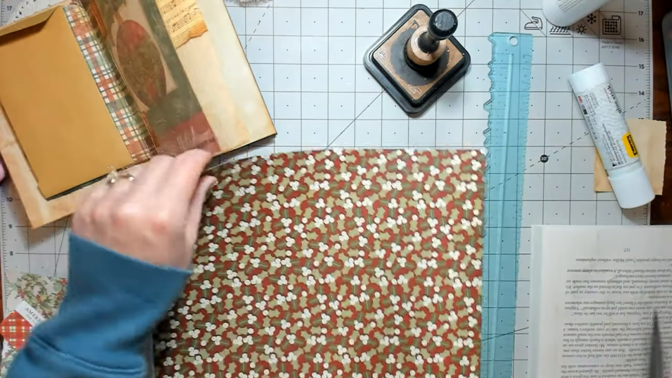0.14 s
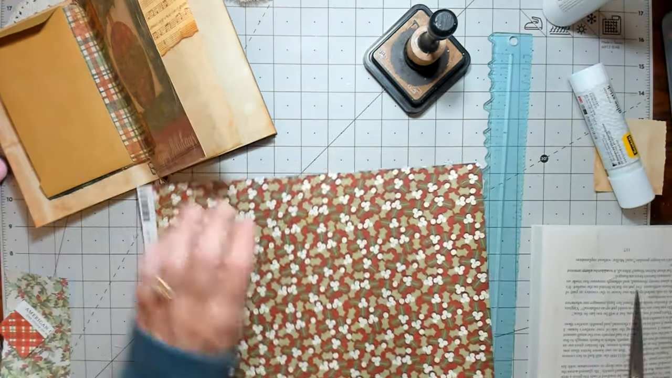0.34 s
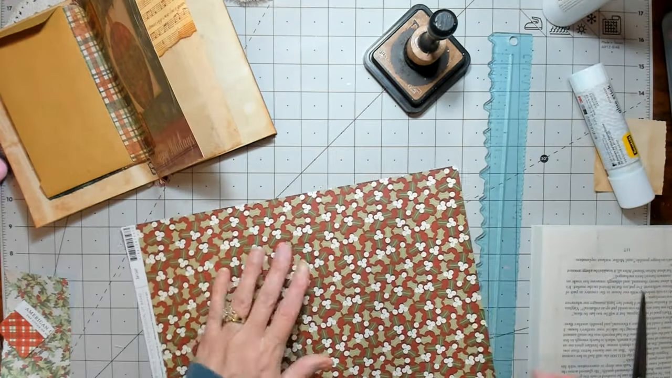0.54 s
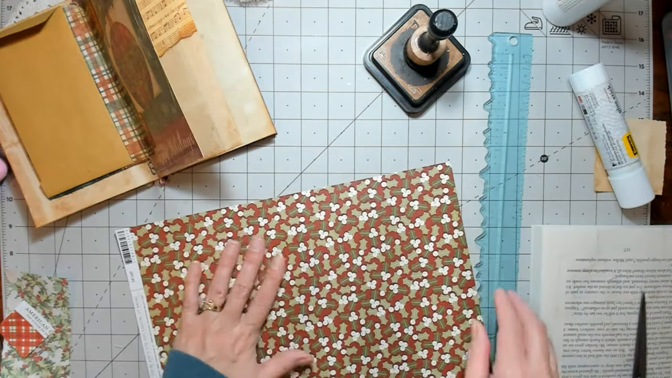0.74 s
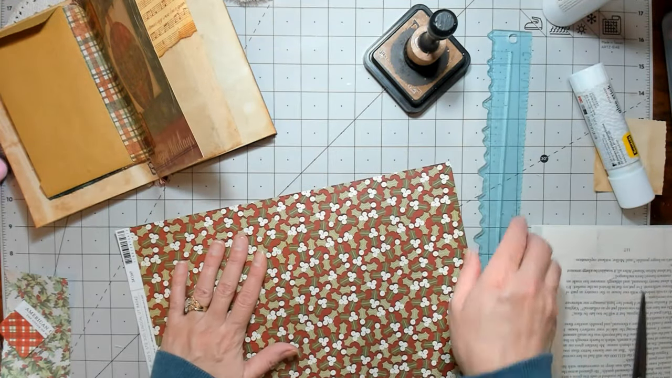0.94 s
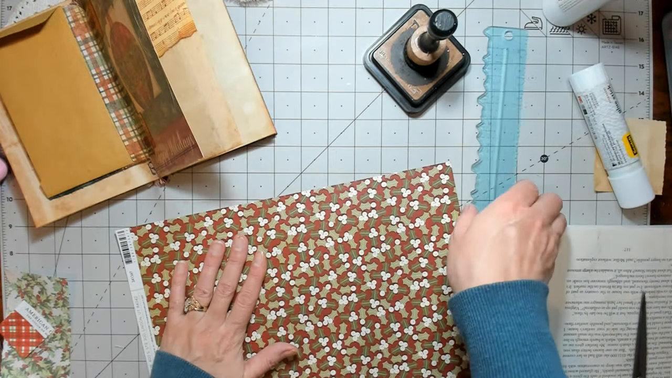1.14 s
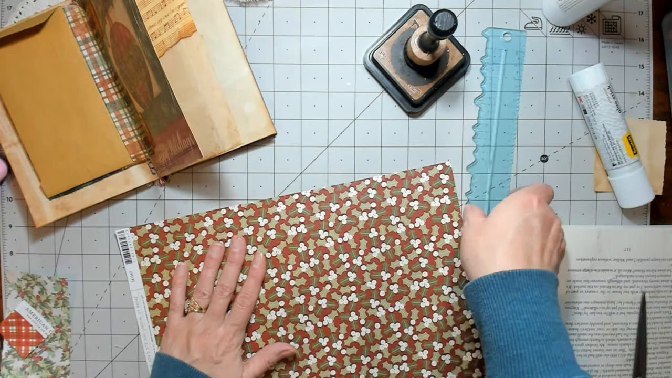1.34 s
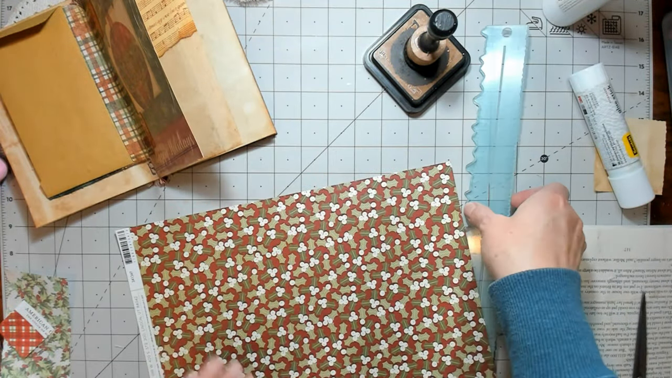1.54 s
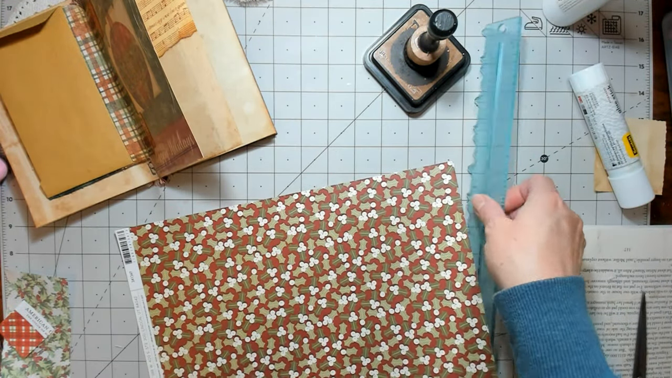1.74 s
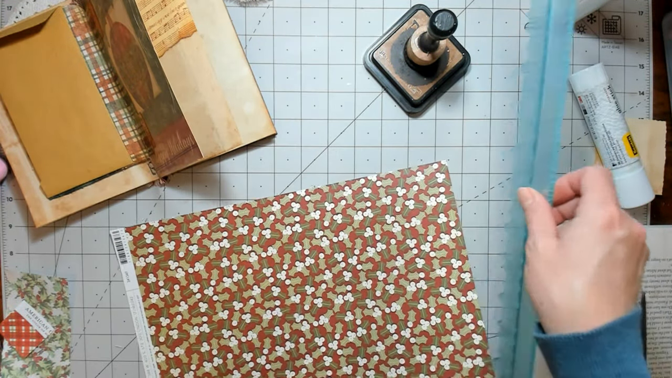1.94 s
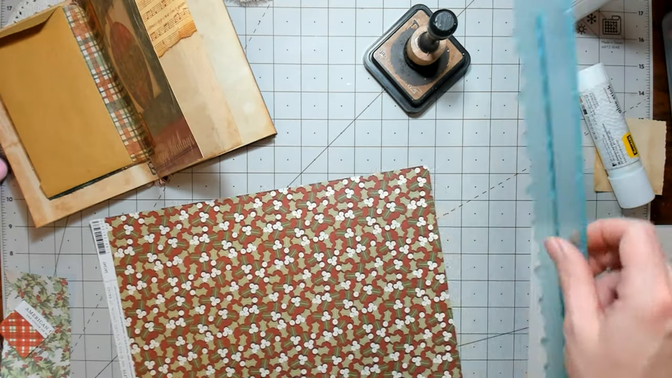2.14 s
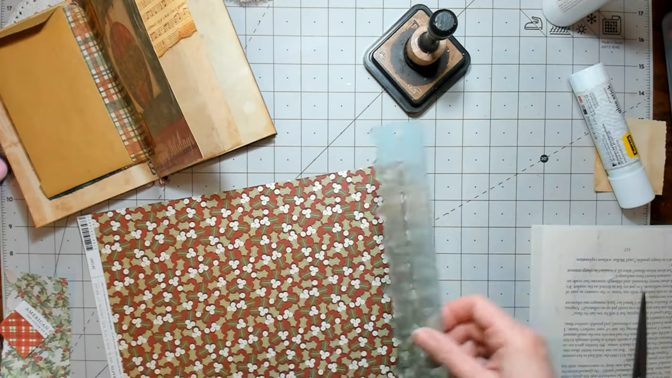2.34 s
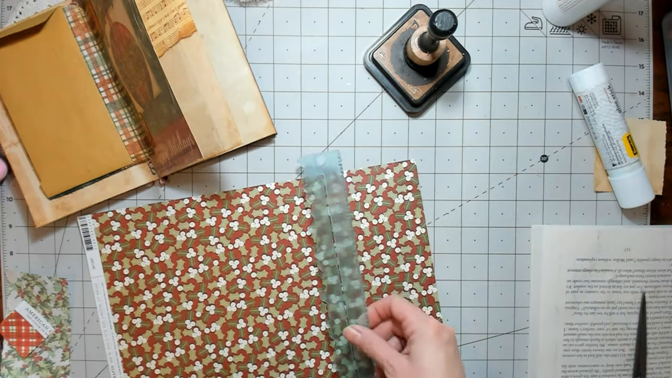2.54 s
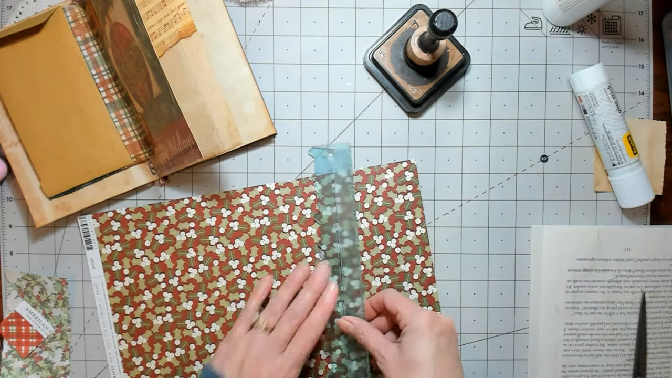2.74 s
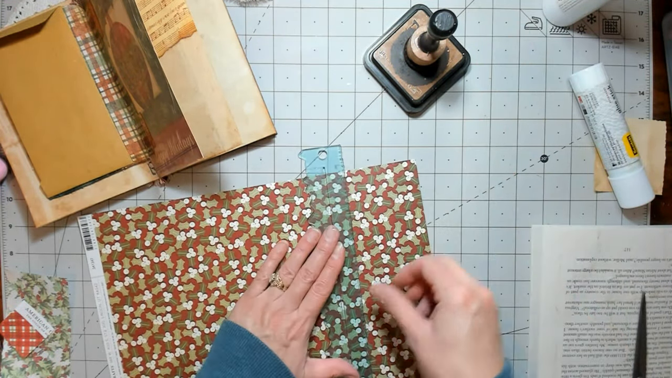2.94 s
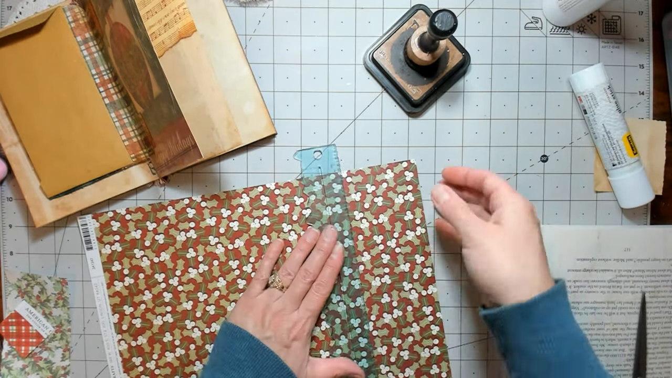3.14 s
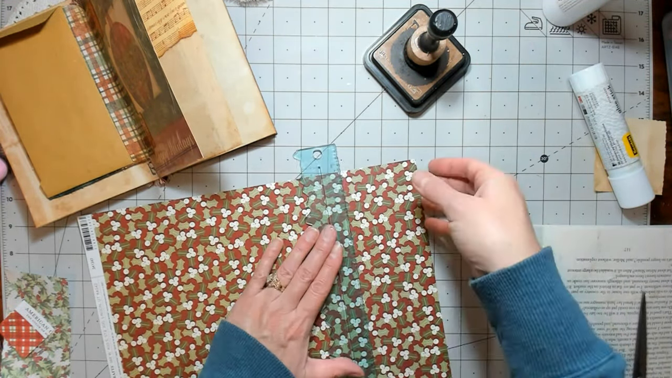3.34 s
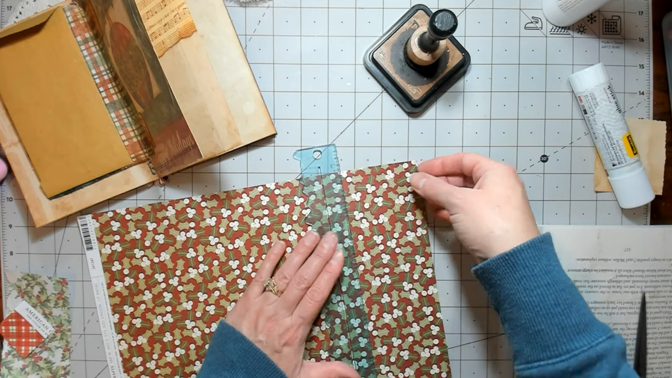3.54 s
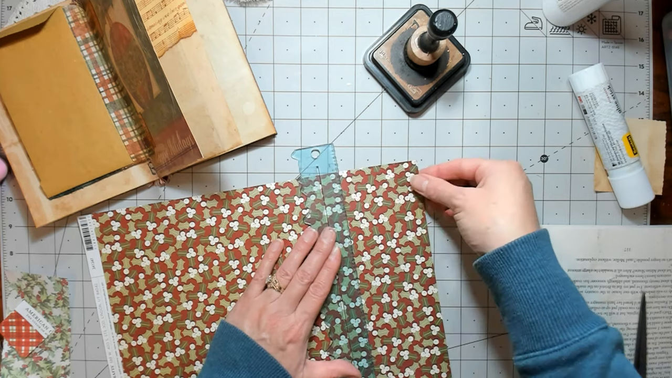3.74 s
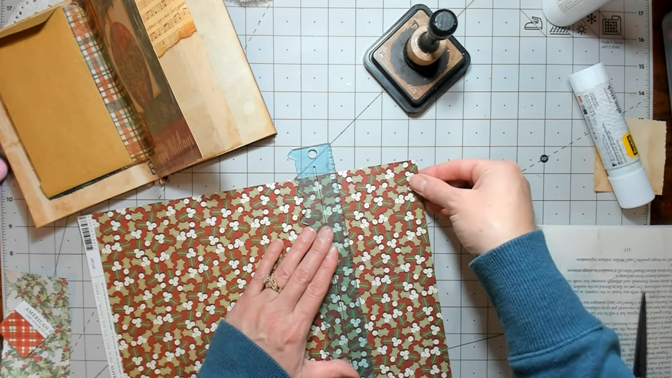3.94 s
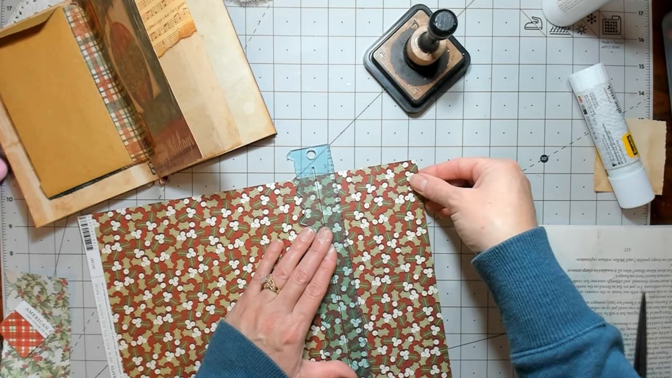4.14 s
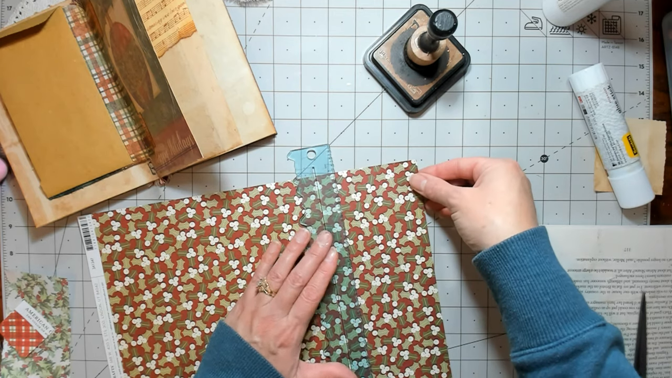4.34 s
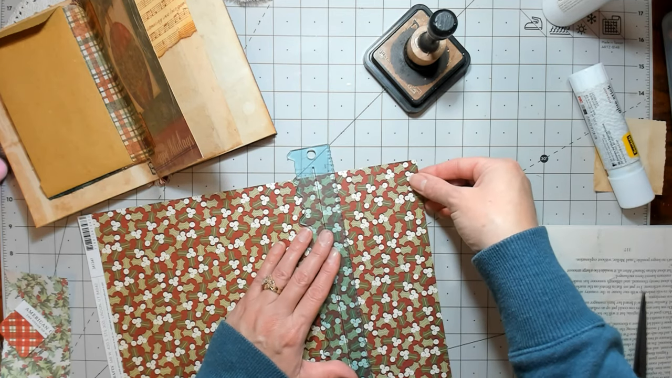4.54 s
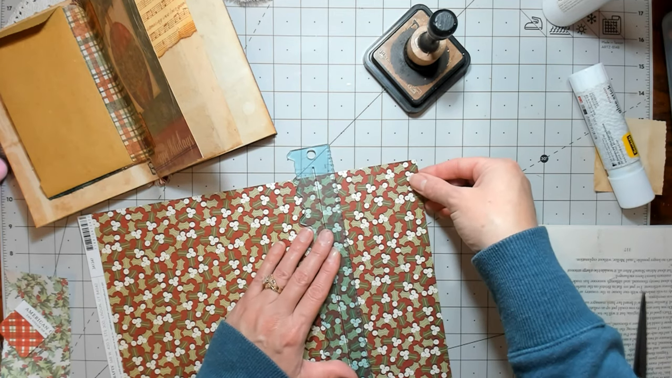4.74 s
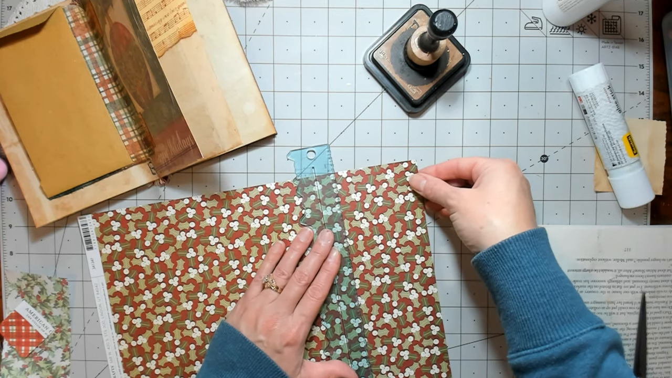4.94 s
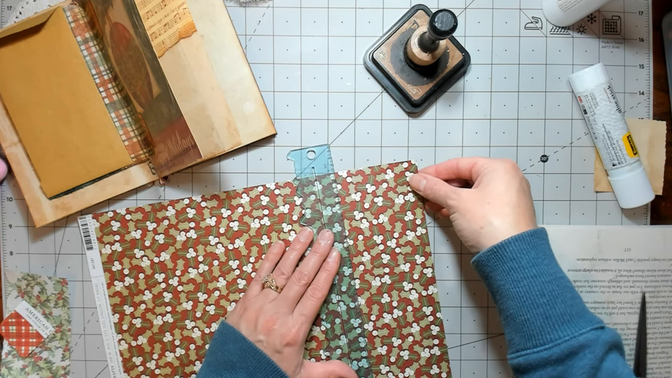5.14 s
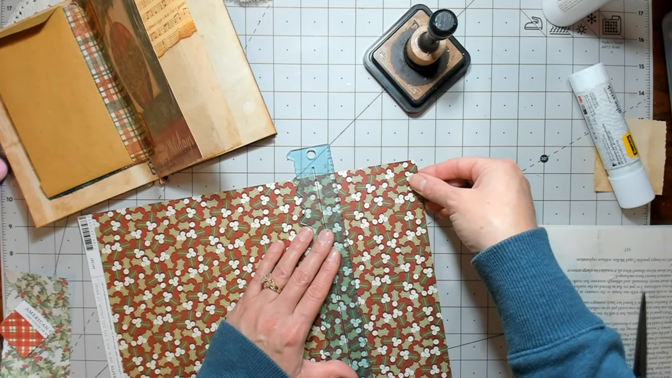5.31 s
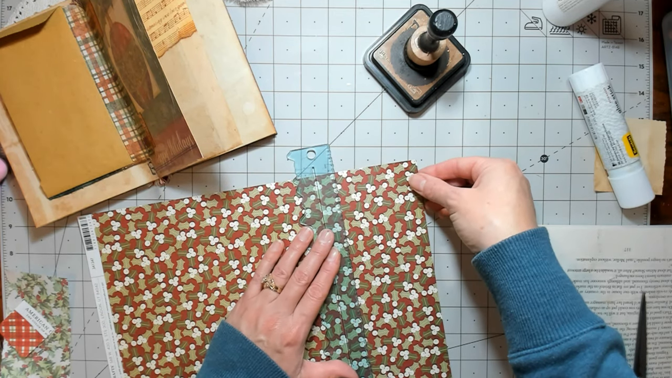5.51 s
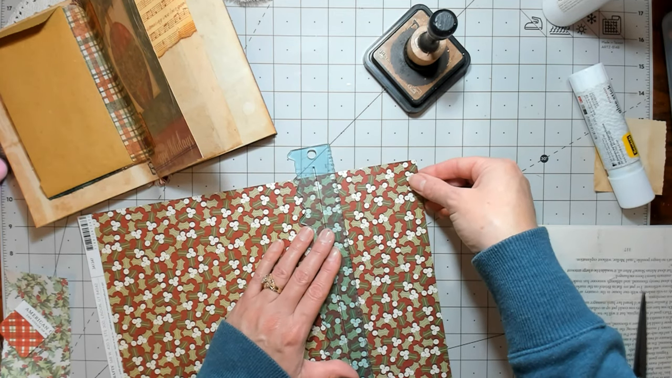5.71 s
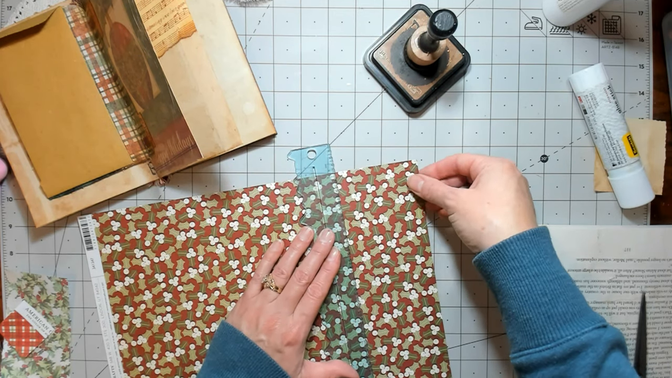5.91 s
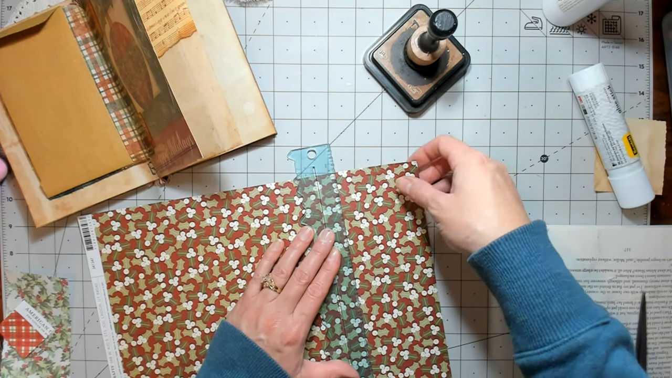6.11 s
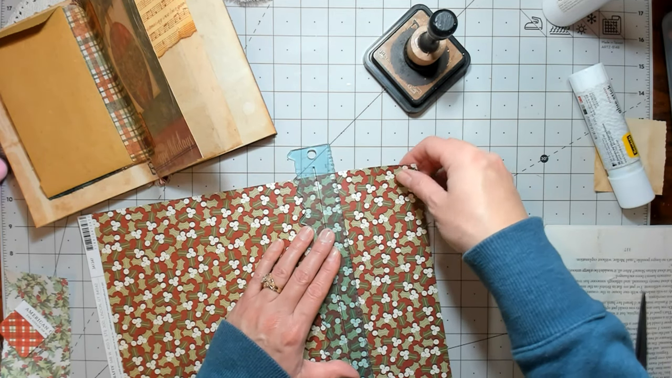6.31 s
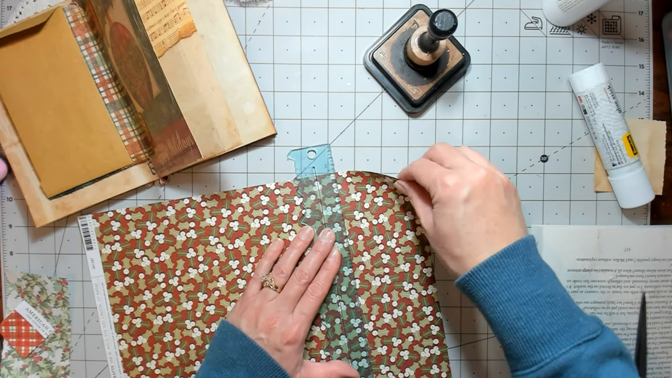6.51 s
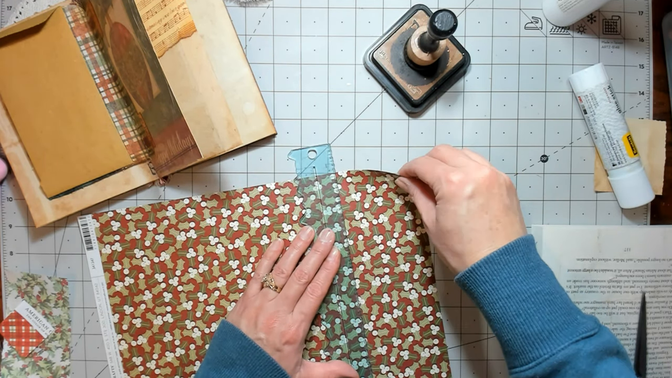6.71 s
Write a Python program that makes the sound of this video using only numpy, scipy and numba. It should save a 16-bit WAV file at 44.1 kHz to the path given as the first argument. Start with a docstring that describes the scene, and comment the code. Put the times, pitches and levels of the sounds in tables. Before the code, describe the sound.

Stiff paper rustles and thumps onto a desk mat, a plastic ruler slides and clacks down, then near silence and a faint papery curl.

```python
"""A hand shifts stiff paper over a cutting mat on a desk: fibres rub (moving noise bands), edges scuff (noise swells),
creases tick (filtered snaps), and hard clacks and soft thuds ring the modes of a plastic ruler and the desk top.
From 1.45 s the ruler is moved over the mat and dropped on the sheet; from 3.25 s a nail plucks at the corner.
Near silence follows, then from 5.75 s the corner curls up. Throughout, a small quiet room gives
short echoes of the hits, low-weighted noise heard as a hum, and a faint electronic whine made of steady sines."""
import sys
import numpy as np
from scipy import signal
from scipy.fft import rfft, irfft
from scipy.io import wavfile
from scipy.ndimage import uniform_filter1d
from numba import njit

SR = 44100
rng = np.random.default_rng(int(sys.argv[2]) if len(sys.argv) > 2 else 0)


def store_pcm(level_fs):
    """Save levels as 16-bit WAV."""
    pcm = np.round(np.clip(level_fs, -1, 1) * 32767).astype(np.int16)
    wavfile.write(sys.argv[1], SR, np.atleast_2d(pcm).T)


N = 302967  # length in samples


def undb(db):
    """Gain of a level in dB."""
    return 10 ** (np.asarray(db) / 20)


def unit(x):
    """Scale to rms 1."""
    return x / np.sqrt(np.mean(x ** 2))


def add(out, s, x):
    """Mix x into out from time s in seconds."""
    i = max(int(s * SR), 0)
    out[i:i + len(x)] += x[:N - i]


@njit
def svf(x, hz, damp):
    """State-variable band-pass whose centre may move; width = damp * centre."""
    y, b, l = np.empty(len(x)), 0., 0.
    for i in range(len(x)):
        g = np.tan(np.pi * hz[i] / SR)
        v = (b + g * (x[i] - l)) / (1 + g * (g + damp))
        b, l, y[i] = 2 * v - b, l + 2 * g * v, damp * v
    return y


def band(x, hz, damp):
    """Steep band-pass: the same resonance twice."""
    hz = np.minimum(hz * np.ones(len(x)), .4 * SR)
    return svf(svf(x, hz, 1. * damp), hz, 1. * damp)


def walk(rate):
    """Random curve gliding between levels drawn rate times a second; spread about 1.4."""
    k = int(SR / rate)
    return 1.66 * uniform_filter1d(np.repeat(rng.standard_normal(N // k + 1), k), k)[:N]


def fibres(grain_db, patchy_db):
    """Fibres catching and letting go: dense uneven clicks in patches."""
    size = np.minimum(rng.exponential(size=N), 5.0)
    return unit(rng.standard_normal(N) * undb(grain_db * size + patchy_db * walk(150)))


def ring(modes, hz, octaves, push, chance):
    """Modes driven by a force; those near hz take most, chance shifts gain and pitch of each. Peak 1."""
    t = np.arange(int(.3 * SR)) / SR
    f, db, t60 = np.transpose(modes)[:, :, None]
    gain = undb(db - 12.0 * (np.log2(f / hz) / octaves) ** 2 + 2 * chance[:, :1])
    pitch = f * (1 + .015 * chance[:, 1:])
    body = np.sum(gain * np.sin(2 * np.pi * pitch * t) * 1000 ** (-t / t60), axis=0)
    y = signal.fftconvolve(body, push)
    return y / np.abs(y).max()


# What else the rubbing gives off, against its own level. Each row: start in seconds,
# fine-fibre hiss in dB (before the pitch slope), sheet flutter in dB.
RUB_SHARES = [(0, -10, -10), (.51, -2, -11.5), (.8, -15, 3.5), (1.451, -3, -14), (2.0, -3.5, -14),
              (2.5, -3, -3.5), (3.199, 3.5, -1), (5.7, -16, -11.5)]
HISS_DB_PER_OCTAVE = 5  # brighter rubbing hisses more
SHAKE_FLUTTER_DB, SHAKE_HISS_DB = -20, -27  # rattle after a clack, against its table level


def rubbing():
    """Sliding contact: a broad moving resonance, hiss and sheet flutter; clacks shake the sheet too."""
    db, hz, touching = rub_curve()
    start, *shares = np.transpose(RUB_SHARES)
    hiss_db, flutter_db = np.array(shares)[:, np.searchsorted(start[1:], np.arange(N) / SR)]
    hiss_db = hiss_db + HISS_DB_PER_OCTAVE * np.log2(hz / 4000)
    slide = unit(band(fibres(3.96, 1.1), hz, 2.3))
    # the edge sings a little: a narrow band with an unsteady pitch
    slide += undb(-11.5) * unit(band(fibres(2.5, 3.1), hz * (1 + 0.037 * walk(25)), 0.084))
    hiss = unit(band(fibres(4, 2), 8600, 1.6))
    flutter = unit(band(fibres(1.5, 3.3), 780, 1.52))
    rub = slide + undb(hiss_db) * hiss + undb(flutter_db) * flutter
    rattle = unit(band(fibres(1.06, 6.3), 1200, 0.91))
    shaken = shaking(CLACKS) * (undb(SHAKE_HISS_DB) * hiss + undb(SHAKE_FLUTTER_DB) * rattle)
    return touching * undb(db) * rub + shaken


# Steady rubbing of paper and skin, one curve for each stretch of handling.
# Each row: time in seconds, level in dB (before the rubbed thing resonates), centre pitch in Hz.
RUBS = [
    [(0.0, -27, 4960), (0.036, -41.5, 4630), (0.16, -29.5, 2600), (0.26, -39.5, 4580), (0.476, -51, 5040),
     (0.512, -74, 6800), (0.54, -41, 6600), (0.584, -47.5, 5830), (0.702, -42, 7250), (0.794, -57, 3930),
     (0.88, -42, 3140), (1.03, -55.5, 4430), (1.238, -47.5, 4900), (1.45, -71.5, 4050)],
    [(1.45, -64, 2830), (1.506, -43.5, 2700), (1.6, -51.5, 4180), (1.808, -41.5, 2780), (1.852, -30, 3300),
     (1.94, -35.5, 3400), (2.0, -44.5, 4030), (2.05, -42.5, 6540), (2.278, -45.5, 4770), (2.32, -60, 3960),
     (2.348, -85, 3000), (2.534, -93, 3100), (2.56, -75, 3400), (2.714, -48.5, 5300), (2.864, -66.5, 5350),
     (3.068, -54, 4390), (3.15, -84, 3520)],
    [(3.25, -80.5, 6600), (3.326, -53.5, 6300), (3.345, -68, 6400), (3.398, -78, 6260), (3.418, -55, 6350),
     (3.5, -79, 4480), (3.6, -58.5, 3890), (3.75, -82, 4060)],
    [(5.75, -84, 5200), (5.8, -61.5, 4800), (5.944, -49.5, 4620), (6.128, -52, 4740), (6.22, -48, 4250),
     (6.348, -56.5, 4300), (6.5, -81, 5940)],
]


def rub_curve():
    """Level, pitch and contact (0-1) of the rubbing at every sample."""
    t = np.arange(N) / SR
    s, db, hz = np.transpose(np.concatenate(RUBS))
    inside = sum((t > r[0][0]) & (t < r[-1][0] + 1e-3) for r in RUBS).clip(0, 1)
    touching = uniform_filter1d(inside * 1., size=400)
    return np.interp(t, s, db), np.interp(t, s, hz), touching


# What the rubbed thing resonates with, one list for each stretch of RUBS: sheet under the palm,
# ruler on the mat, nail under the corner, corner curling up.
# Each row: pitch in Hz, filter width in Hz, level in dB.
HOLLOWS = [
    [(2580, 2600, -38), (3960, 120, -2.5), (5400, 1230, -15), (7100, 750, 3.5)],
    [(2000, 770, -16.5), (2620, 130, -1.5), (3570, 2400, -9), (5750, 620, 0.5), (9510, 750, -14)],
    [(2250, 1200, 3), (3400, 960, 3), (6370, 3500, 0.5), (10300, 600, 5)],
    [(3090, 1400, -0.5), (4550, 750, 10), (6500, 1500, -8), (7720, 690, 7.5), (9360, 1500, -3)],
]


def hollow(x):
    """Rubbing rings the thing being rubbed, which changes from one move to the next."""
    out = x.copy()
    for rows, peaks in zip(RUBS, HOLLOWS):
        a, b = int(rows[0][0] * SR), int(rows[-1][0] * SR)
        out[a:b] = 0.67 * x[a:b]
        for k, (hz, width, db) in enumerate(peaks):
            out[a:b] += (-1) ** k * undb(db) * band(x[a:b], hz, width / hz)  # alternating sign
    return out


# Short scuffs as an edge slips. Each row: start in seconds, level in dB (before the rubbed thing resonates),
# pitch in Hz, filter width as a multiple of the pitch, rise in seconds, hold in seconds.
SCUFFS = [(0.026, -28, 2380, 3.1, 0.0059, 0.045), (0.097, -21.5, 1980, 1.1, 0.062, 0.011),
          (0.159, -24.5, 2880, 1.1, 0.012, 0.039), (0.327, -45, 4360, 0.48, .005, .11),
          (0.533, -56, 7000, 1.5, .002, .015), (0.552, -36.5, 6900, 7, .005, 0.021),
          (0.862, -33, 2730, 1.6, 0.0084, 0.025), (1.029, -42, 2000, 2.5, 0.012, 0.0079),
          (1.036, -34, 4740, 1.46, 0.037, 0.023), (1.056, -43, 796, 1.1, 0.022, 0.048),
          (1.149, -31.5, 2860, 2.7, 0.0062, 0.0063), (1.188, -33, 1590, 4.7, 0.026, 0.015),
          (1.203, -38.5, 1220, 1.1, 0.0075, 0.028), (1.346, -46.5, 5100, 0.53, .003, 0.019),
          (1.483, -45.5, 2380, 0.34, 0.0096, 0.079), (1.675, -36.5, 2210, 0.97, 0.0058, 0.064),
          (1.732, -34.5, 3500, 2.4, 0.018, 0.028), (1.82, -50.5, 470, 0.42, .008, 0.069),
          (2.038, -39, 10500, 0.64, 0.037, 0.052), (2.086, -39, 3770, 1.1, .014, 0.024),
          (2.25, -33, 5000, 1.5, 0.0047, .008), (2.258, -45, 1150, .5, 0.0037, .008),
          (2.576, -27, 4270, 3.1, .003, 0.03), (2.76, -47, 6200, 0.66, .009, .003),
          (3.304, -47, 6250, 0.44, 0.013, .004), (3.408, -45, 6630, 0.59, .004, 0.017),
          (3.521, -56.5, 3460, 0.48, 0.0029, 0.033), (3.558, -34.5, 4100, 0.8, 0.039, 0.012),
          (3.598, -37.5, 1950, 0.29, 0.0066, 0.0015), (3.634, -46, 4200, 0.57, 0.024, 0.019),
          (5.193, -53.5, 4400, .3, 0.0074, 0.0077), (5.777, -49.5, 5300, 1.1, 0.0045, 0.011),
          (5.888, -44.5, 4800, 1.9, 0.021, 0.02), (5.906, -56, 1000, 1.6, 0.009, 0.035),
          (5.999, -39, 4640, 2, 0.0024, 0.034), (6.188, -34.5, 3880, 1.4, 0.032, 0.01),
          (6.255, -39.5, 4040, 1.1, 0.021, 0.007), (6.338, -49.5, 4600, 2.6, 0.0076, 0.018)]
SCUFF_T60_S = 0.049


def scuffs():
    """Each slip swells, holds and dies: a band cut from rough fibre noise."""
    out, rough = np.zeros(N), fibres(3.5, 1.9)
    for s, db, hz, width, rise, hold in SCUFFS:
        t = np.arange(int((rise + hold + SCUFF_T60_S) * SR)) / SR
        x = rough[int(s * SR):][:len(t)]
        swell = np.minimum(t / rise, 1) ** 2.1
        decay = 1000 ** (-np.maximum(t - rise - hold, 0) / SCUFF_T60_S)
        add(out, s, undb(db) * swell * decay * unit(band(x, hz, width)))
    return out


# Creases that snap over. Each row: time in seconds, peak in dB at the source.
TICKS = [(0.0104, -32), (0.0155, -22), (0.0194, -12.5), (0.2346, -20), (0.274, -25.5), (0.5264, -23),
         (0.5372, -23), (0.738, -28.5), (1.041, -34), (1.3205, -30), (1.333, -30.5), (1.6732, -26.5),
         (1.711, -20), (1.734, -18), (1.8372, -29), (1.8502, -35), (1.9046, -16), (2.2059, -34),
         (2.628, -21), (2.7582, -20), (2.7682, -20.5), (2.992, -41), (3.055, -30.5), (3.27, -43),
         (3.3188, -15.5), (3.4464, -29.5), (4.1414, -44), (6.2277, -35), (6.4033, -36.5), (6.4732, -35)]
TICK_HZ, TICK_HZ_PER_DB = 8500, 83.5  # pitch at 0 dB; harder snaps are brighter
# small random snaps while rubbing: rate, mean peak against the rubbing level, spread of the peak
CREASES_PER_S, CREASE_DB, CREASE_SCATTER_DB = 60, 6, 4.5


def ticks():
    """A crease buckles: a very short noise snap, band-passed, with a crumbly tail."""
    out, t = np.zeros(N), np.arange(600) / SR
    rub_db, _, touching = rub_curve()
    at = np.flatnonzero((rng.random(N) < CREASES_PER_S / SR) & (touching > .5))
    small_db = rub_db[at] + CREASE_DB + CREASE_SCATTER_DB * rng.standard_normal(N)[at]
    for s, db in [*TICKS, *zip(at / SR, small_db)]:
        snap = np.exp(-t / .0003)
        crumble = 0.3 * np.exp(-t / 0.0043)
        x = rng.standard_normal(600) * (snap + crumble)
        x = band(x, max(TICK_HZ + TICK_HZ_PER_DB * db, 3000), 1.0)
        x = x + 0.1193 * np.diff(x, prepend=0) + 0.091 * x  # slight treble lift
        add(out, s, undb(db) * x / np.abs(x).max())
    return out


# Ruler and knuckles striking the mat. Each row: time in seconds, peak of the slap in dB at the source,
# pitch most excited in Hz, spread (octaves for the ruler modes, multiple of the pitch for the slap filter).
CLACKS = [(.100, -13, 1730, 0.52), (.839, -16.5, 2820, 3), (0.953, -21.5, 3270, 1.1),
          (1.109, -25.5, 1590, 3), (1.659, -38, 2530, 1.1), (1.788, -14, 1860, 1.9),
          (1.9495, -7, 1640, 2.04), (2.359, -6, 2550, 1.5), (2.5435, -7.5, 3000, 2.15),
          (2.5712, -14.5, 3050, 0.7), (2.5834, -12, 4420, 2.5), (2.6054, -11, 2810, 1.05),
          (2.7402, -14, 1030, 2.96)]
# Modes of the plastic ruler. Each row: pitch in Hz, relative level in dB, decay time T60 in seconds.
RULER = [(700, -3, .05), (1110, 1, .045), (1450, -4, .025), (1750, -5, .02), (2200, -3, .015),
         (2550, -3, .012), (2860, 0, .012), (3050, -2, .015), (3450, -2, .012), (4020, -4, .01),
         (4650, -6, .008), (5400, -7, .006), (7450, -8, .006)]
CHATTER_S = 0.0043  # decay constant


def clacks():
    """Hard plastic on the mat: a sharp blow, then chattering contact; both ring the well damped ruler."""
    out, t = np.zeros(N), np.arange(3000) / SR
    noises = rng.standard_normal((len(CLACKS), 3000 + 2 * len(RULER)))
    for (s, db, hz, spread), noise in zip(CLACKS, noises):
        rough, chance = noise[:3000], noise[3000:].reshape(-1, 2)
        blow = np.exp(-t / .0011)
        push = rough * (blow + undb(-1.0) * np.exp(-t / CHATTER_S))
        # mat and paper answer over a broad band
        broad = spread * undb(-21) * np.diff(rough * blow, prepend=0)
        slap = band(push, hz, spread) + broad
        add(out, s, undb(db) * slap / np.abs(slap).max())
        add(out, s, undb(db - 6.5) * ring(RULER, hz, spread, push, chance))
    return out


# Palm, sheet and ruler landing on the desk top. Each row: time in seconds, peak in dB at the source,
# pitch most excited in Hz, spread in octaves.
THUDS = [(0.156, -18.5, 242, 0.54), (0.166, -5, 308, 0.8), (.19, -15.5, 236, .45), (0.273, -10.5, 428, .45),
         (0.326, -29, 302, .8), (0.572, -31, 177, 0.88), (0.739, -30.5, 175, 1), (0.841, -17.5, 198, 0.87),
         (0.954, -26.5, 184, 0.87), (1.083, -31.5, 175, 1.3), (1.158, -30, 310, 0.63),
         (1.203, -29.5, 398, 1.2), (1.23, -23.5, 172, 0.92), (1.321, -39, 128, 0.48),
         (1.565, -39, 264, 0.31), (1.788, -22.5, 302, 1.6), (1.950, -24, 200, 1.6), (2.365, -30, 220, .45),
         (2.378, -32, 200, .4), (2.548, -31, 215, 0.37), (2.605, -33.5, 225, 0.64), (2.741, -13, 317, 2.1),
         (2.991, -41.5, 176, 1.2), (6.008, -41.5, 250, 1.3), (6.215, -42, 254, 1.2)]
# Modes of the desk top. Each row: pitch in Hz, relative level in dB, decay time T60 in seconds.
DESK = [(80.5, -7.5, 0.19), (125.2, -3, 0.23), (192.6, 13.5, 0.047), (233.8, 1.5, 0.15), (311, 11, 0.042),
        (389.4, 10, 0.035), (495.5, 5.5, 0.12), (570, -1, 0.097), (703, 9, .1), (850, -10.5, 0.058)]
PUSH_S = 0.00077  # length of the half-sine


def thuds():
    """Soft blows: a half-sine push, then uneven settling, ring the desk top."""
    out, t = np.zeros(N), np.arange(2000) / SR
    noises = rng.standard_normal((len(THUDS), 2000 + 2 * len(DESK)))
    for (s, db, hz, octaves), noise in zip(THUDS, noises):
        rough, chance = noise[:2000], .5 * noise[2000:].reshape(-1, 2)
        settling = 0.17 * rough * np.exp(-t / .012)
        force = np.sin(np.pi * np.minimum(t / PUSH_S, 1)) + settling
        add(out, s, undb(db) * ring(DESK, hz, octaves, force, chance))
    return out


SHAKE_T60_S = 0.17


def shaking(blows):
    """Decaying envelope of the shaking that each blow leaves behind."""
    out, t = np.zeros(N), np.arange(int(.3 * SR)) / SR
    for s, db, *_ in blows:
        add(out, s, undb(db) * 1000 ** (-t / SHAKE_T60_S))
    return out


RUMBLE_HZ = 62
RUMBLE_DB, SLIDE_RUMBLE_DB = -47.5, -31  # against the compressed thud envelope, against the rubbing


def rumble():
    """Handling shakes the desk: a low noise band that follows the thuds and the rubbing."""
    db, _, touching = rub_curve()
    from_thuds = undb(RUMBLE_DB) * shaking(THUDS) ** 0.46  # exponent compresses and lengthens
    shake = from_thuds + touching * undb(db + SLIDE_RUMBLE_DB)
    return shake * unit(band(rng.standard_normal(N), RUMBLE_HZ, 1.36))


ROOM_T60_S, ROOM_DB, ROOM_HZ = 0.21, -15, 4940  # decay, echo level, low-pass corner


def room(x):
    """Dense reflections swelling over a few ms, duller than the direct sound."""
    t = np.arange(int(.5 * SR)) / SR
    tail = rng.standard_normal(len(t)) * 1000 ** (-t / ROOM_T60_S) * np.minimum(t / 0.0055, 1)
    tail = signal.lfilter(*signal.butter(1, ROOM_HZ, fs=SR), tail)
    return signal.fftconvolve(x, tail / np.sqrt(np.sum(tail ** 2)))[:N]


# Colour of the room noise. Each row: pitch in Hz, relative spectral level in dB.
AIR = [(11, -52.5), (18, -18.5), (33, -18), (60, -18.5), (92, -11), (149, 4), (216, -5), (381, -5.5),
       (416, -6), (638, -5.5), (848, -9), (4700, -22.5), (8560, -26.5), (15100, -30.5), (16500, -43.5)]
AIR_DB = -60.5  # mean level of the whole noise
# Electronic whine. Each row: pitch in Hz, rms level in dB.
WHINE = [(4161, -89), (8280, -86), (8339, -89)]


def air():
    """Slightly wavering room noise, weighted to the lows as a hum, and thin steady sine whines."""
    f = np.maximum(np.fft.rfftfreq(N, 1 / SR), 1)
    hz, db = np.transpose(AIR)
    colour = undb(np.interp(np.log(f), np.log(hz), db))
    noise = unit(irfft(rfft(rng.standard_normal(N)) * colour, N))
    t = np.arange(N) / SR
    whine = sum(np.sqrt(2) * undb(d) * np.sin(2 * np.pi * h * t) for h, d in WHINE)
    return noise * undb(AIR_DB + 0.4 * walk(10)) + whine


def scene():
    """The desk close by, the echo of its hits in the room and the room's own noise."""
    hits = hollow(scuffs()) + ticks() + clacks() + thuds()
    desk = hollow(rubbing()) + hits + undb(ROOM_DB) * room(hits)
    # small things radiate little bass
    high_pass = signal.butter(2, 150, "high", fs=SR, output="sos")
    desk = 0.015 * desk + signal.sosfilt(high_pass, desk)
    return (desk + rumble() + air())[None]


TOP_HZ = 15900


def record(dry):
    """Steep elliptic low-pass: nothing is heard above about 16 kHz."""
    return signal.sosfilt(signal.ellip(10, .2, 60, TOP_HZ, fs=SR, output="sos"), dry)


dry = scene()
out = record(dry)
store_pcm(out)
```